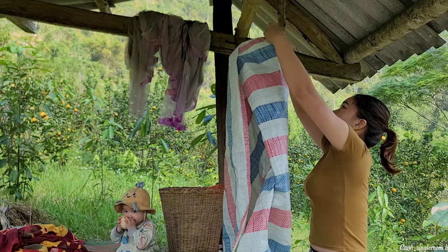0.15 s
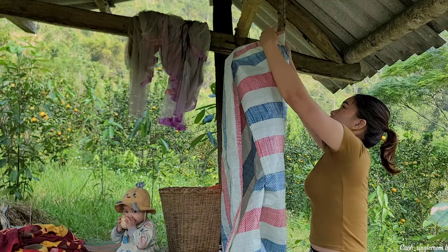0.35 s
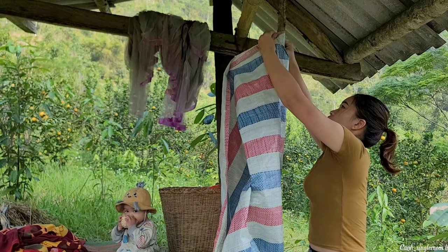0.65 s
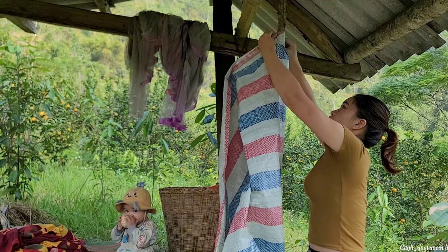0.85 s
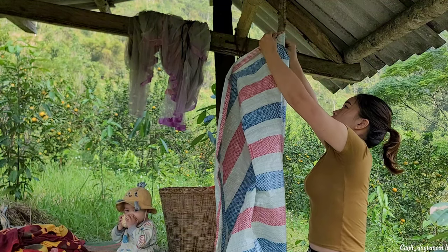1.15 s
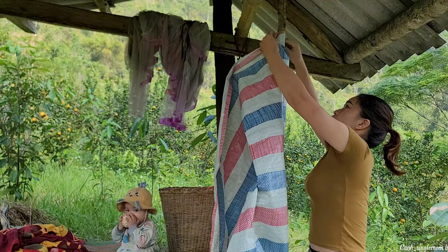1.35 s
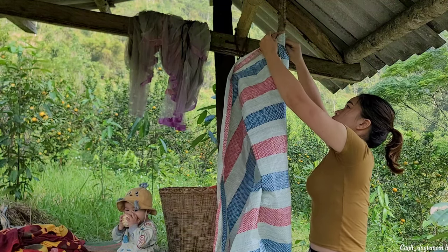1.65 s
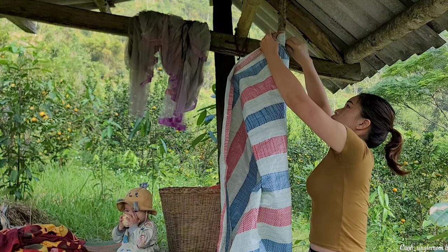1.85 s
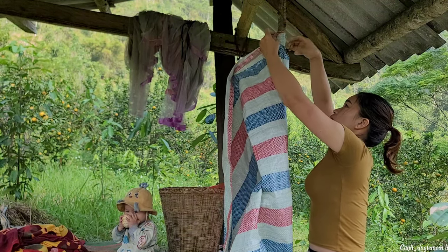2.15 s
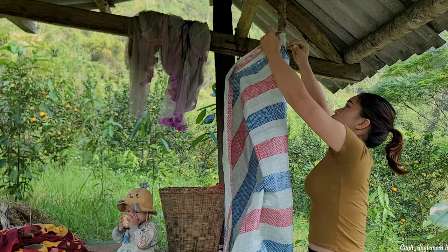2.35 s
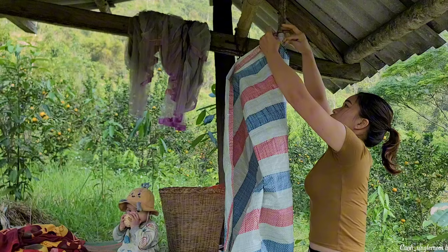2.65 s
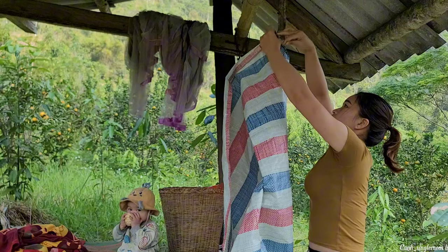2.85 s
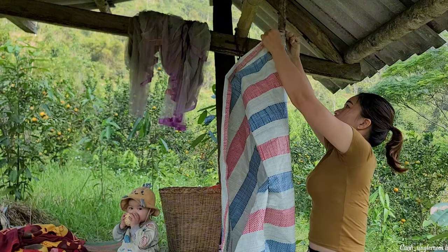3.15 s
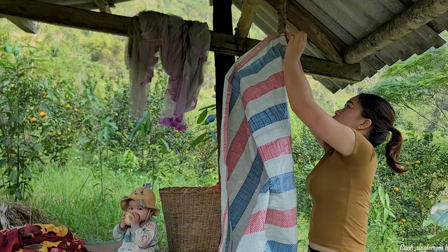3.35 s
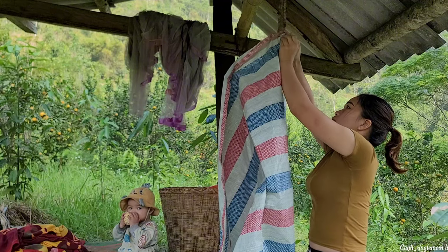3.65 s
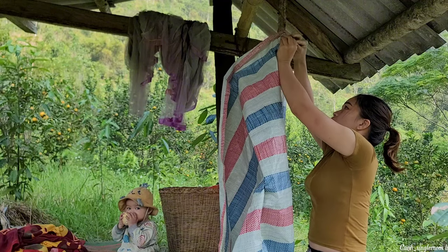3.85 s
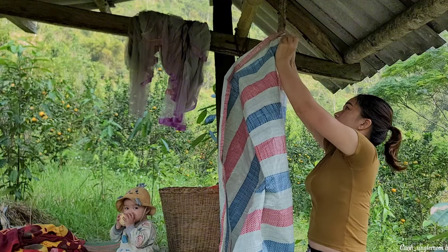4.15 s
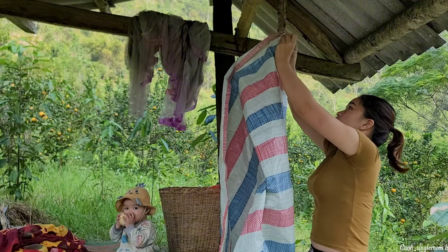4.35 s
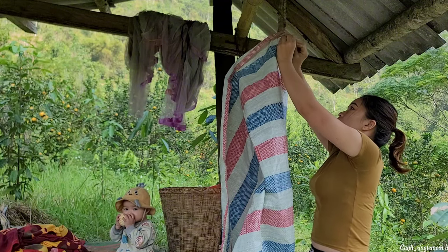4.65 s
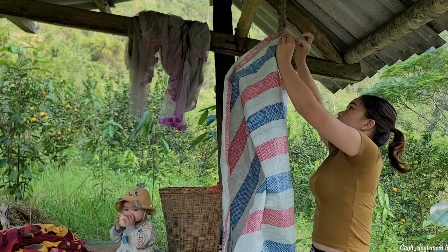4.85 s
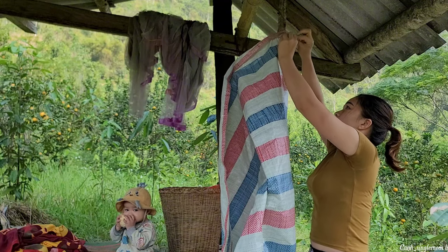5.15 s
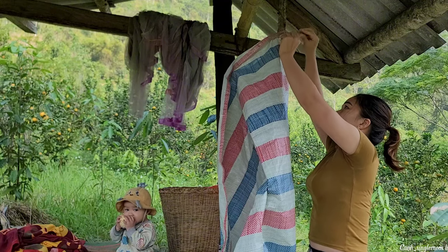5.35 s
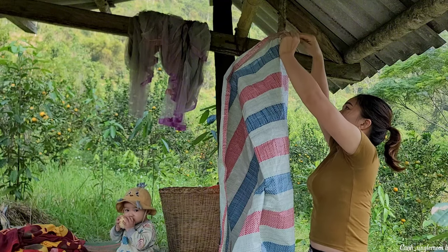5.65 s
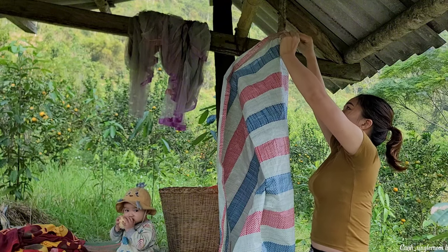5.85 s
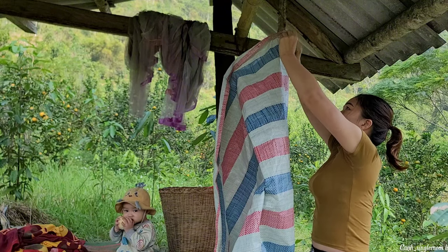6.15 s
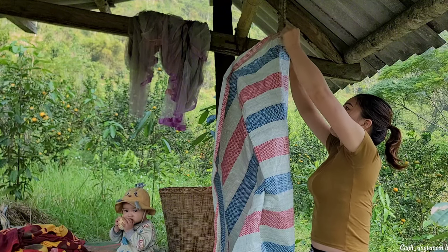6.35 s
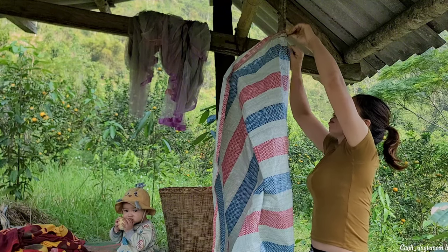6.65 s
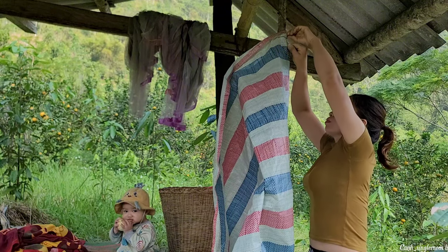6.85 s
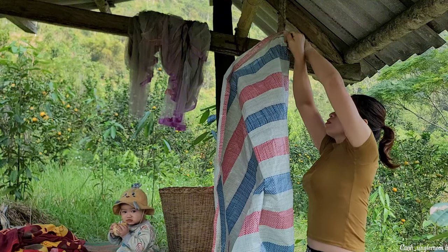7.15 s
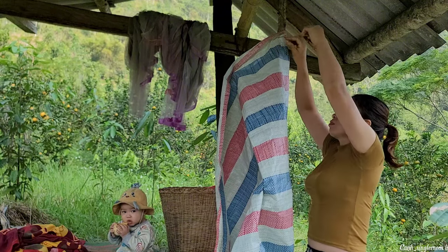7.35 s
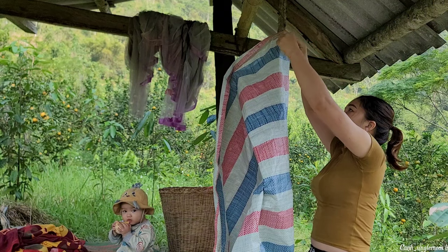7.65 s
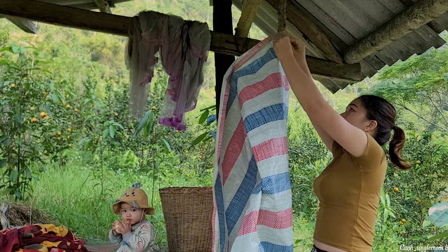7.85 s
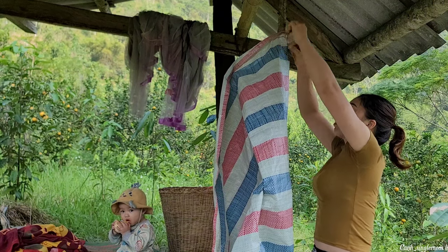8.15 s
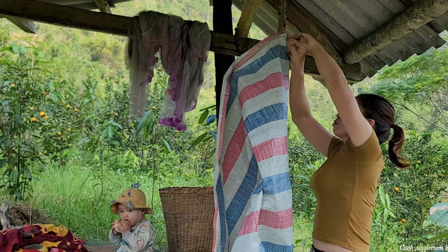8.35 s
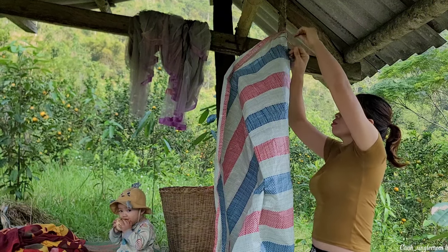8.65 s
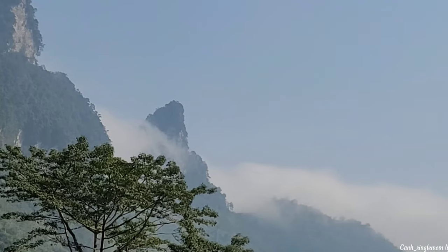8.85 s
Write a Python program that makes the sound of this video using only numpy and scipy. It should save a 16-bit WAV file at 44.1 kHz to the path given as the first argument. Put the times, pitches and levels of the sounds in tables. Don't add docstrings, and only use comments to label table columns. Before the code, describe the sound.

Close by, a woven plastic tarpaulin crackles, slides and snaps as hands tie it beneath a tin-roofed shelter. The busiest, sharpest rustling comes in the first second, then sparse tugs and dull pops. Insects hiss steadily, small birds whistle falling notes, a distant motor whines briefly, and three far wooden knocks echo. Soft low wind bumps touch the stereo microphone; at the very end the sound cuts to a windier hillside.

```python
import sys
import numpy as np
from scipy import signal
from scipy.io import wavfile
from scipy.ndimage import uniform_filter1d

SR = 44100
rng = np.random.default_rng(int(sys.argv[2]) if len(sys.argv) > 2 else 0)


def put_to_file(sound):
    columns = np.atleast_2d(sound).T
    safe = np.clip(columns, -1, 1)
    whole_steps = np.round(safe * 32767)
    wavfile.write(sys.argv[1], SR, whole_steps.astype(np.int16))


def linear_from_db(decibels):
    return 10 ** (np.asarray(decibels, float) / 20)


N = 396459
GAP_S = 8.737
# (time [s], level [dB], left minus right [dB], length [s])
BUFFETS = [(.02, -49, -16, 0.058), (0.501, -42, 11.5, 0.026), (0.768, -44.5, -4.5, 0.094),
           (0.882, -41, -10, 0.069), (1.016, -50, 31, 0.042), (1.109, -41, -7.5, 0.078),
           (2.147, -47, -1, 0.054), (3.141, -41.5, -6, 0.028), (3.384, -43, 3, 0.038),
           (3.527, -43.5, -5, 0.092), (3.689, -45, -10, 0.039), (3.802, -47.5, -8.5, 0.12),
           (4.03, -57, -4, 0.08), (4.629, -48.5, -2, 0.039), (6.675, -47.5, -4, 0.13),
           (7.23, -51.5, -10, 0.084), (7.72, -48, 1.5, 0.057), (8.274, -48.5, -3, 0.044),
           (8.504, -43.5, -8.5, 0.03), (8.803, -35.5, 12, 0.097), (8.87, -36, 17, 0.089)]


def evened(x):
    return x / np.sqrt(np.mean(x ** 2) + 1e-20)


def read(points, hz):
    f, value = np.transpose(points)
    return np.interp(np.log(hz + 1), np.log(f + 1), value)


def along(rows, t):
    s, *columns = np.transpose(rows)
    return [np.interp(t, s, c) for c in columns]


def add(mix, s, sound):
    part = mix[round(s * SR):][:len(sound)]
    part += sound[:len(part)]


def shelter_db(hz):
    # (frequency [Hz], width [Hz], gain [dB])
    modes = [(219, 15, 13), (352.7, 27.6, 9), (584, 19, 7), (711, 61, 8.5), (1012, 59, 8.5),
             (1100, 45, 5.5), (1438, 20, 8.5)]
    return sum(db / (1 + (2 * (hz - f) / width) ** 2) for f, width, db in modes)


def coloured(x, points, ringing=0):
    hz = abs(np.fft.fftfreq(4096, 1 / SR))
    log = np.log(linear_from_db(read(points, hz) + ringing * shelter_db(hz)))
    taps = np.fft.ifft(np.exp(log - 1j * signal.hilbert(log).imag)).real[:2048]
    taps = taps[None] / np.linalg.norm(taps)
    return signal.oaconvolve(x, taps, axes=-1)[:, :x.shape[1]]


def echoes(t60, gap):
    t = np.arange(int(SR * min(t60, 1))) / SR
    signs = rng.choice([-1., 1.], (2, SR))[:, :len(t)]
    arrives = rng.random((2, SR))[:, :len(t)] < .06
    taps = signs * arrives * linear_from_db(-60 * t / t60) * (t > gap)
    return taps / np.linalg.norm(taps, axis=1)[:, None]


def heard(x, lag, pan_db, wet_db, t60):
    direct = np.array([np.roll(x, lag) * linear_from_db(pan_db / 2), x * linear_from_db(-pan_db / 2)])
    reflected = signal.oaconvolve(x[None], echoes(t60, 0.0013), axes=1)[:, :N]
    return direct + linear_from_db(wet_db) * reflected


def tones(hz, db, partials, wobble, flutter_db=0):
    shake, flutter = evened(uniform_filter1d(rng.standard_normal((2, SR * 2)), 150))[:, :len(hz)]
    turn = 2 * np.pi * np.cumsum(hz * (1 + wobble * shake)) / SR
    stack = sum(linear_from_db(part_db) * np.sin(k * turn) for k, part_db in partials)
    return np.sqrt(2) * linear_from_db(db + flutter_db * flutter) * stack * signal.windows.tukey(len(hz), .07)


def air():
    # (frequency [Hz], coherence [0 to 1])
    likeness = [(100, 0.7), (400, 0.64), (1500, 0.55), (4000, 0.18), (12000, 0.66)]
    # (frequency [Hz], density [dB per Hz])
    valley = [(150, -9), (215, -19), (260, -9.5), (350, -3.5), (440, -3), (700, -8), (900, -11.5),
              (1600, -13.5), (2600, -12), (3500, -21), (7500, -34), (10000, -32), (13300, -22.5),
              (14500, -16.5)]
    # (frequency [Hz], density [dB per Hz])
    hillside = [(150, -6), (310, 9.5), (400, -7), (650, 1.5), (1000, -1), (1180, 4.5), (1600, -6),
                (3500, -14.5), (4700, -0.5), (7500, -27), (11000, -28), (14500, -12)]
    # (frequency [Hz], density [dB per Hz])
    chorus = [(3700, -17.5), (4300, -5), (4700, -3.5), (5300, -8), (5800, -10.5), (6800, -10), (7500, -26)]
    # (time [s], level [dB])
    chirps = [(.69, -5), (1.3, -2), (2.78, -4), (3.6, -4), (4.6, -4), (5.4, -5), (6.569, -3.5), (7.4, -5),
              (8.5, 2)]
    air_db, hill_db = -58.5, 2
    frames, hz = N // 512 + 5, np.fft.rfftfreq(2048, 1 / SR)
    t = np.arange(frames) * 512 / SR
    a, b, c, d, patches = rng.standard_normal((frames, 1025, 5)).T
    patches = evened(uniform_filter1d(uniform_filter1d(patches, 24, 0), 9, 1))
    same = np.clip(read(likeness, hz), 0, 1)[:, None]
    right = a + 1j * b
    late = np.exp(-2j * np.pi * hz * 20 * np.clip(hz / 600, 0, 1) / SR)[:, None]
    z = np.array([same * late * right + np.sqrt(1 - same ** 2) * (c + 1j * d), right])
    under_roof_db = (read(valley, hz) + shelter_db(hz))[:, None]
    murmur_db = np.where(t < GAP_S, under_roof_db, read(hillside, hz)[:, None] + hill_db)
    swells = sum(linear_from_db(db) * np.exp(-((t - s) / 0.084) ** 2) for s, db in chirps)
    hz = hz[:, None]
    chirr = linear_from_db(8.0) * swells * np.exp(-((hz - 5080) / 150) ** 2)
    size = np.sqrt(linear_from_db(murmur_db) ** 2 + linear_from_db(read(chorus, hz)) ** 2 + chirr ** 2)
    side = linear_from_db(1.8 * np.clip(1.5 - hz / 8000, 0, 1) * [[[-1]], [[1]]])
    z *= size * linear_from_db(2.0 * patches) * (hz > 120) * side
    return linear_from_db(air_db) * evened(signal.istft(z, nperseg=2048, noverlap=1536)[1][:, :N])


def machine():
    # (harmonic number [1], level [dB])
    harmonics = [(7, -11.5), (8, -12.5), (10, -13), (11, -28), (12, -4.5), (13, -12)]
    # (start [s], length [s], held shaft rate [Hz], level at start [dB], level held [dB])
    runs = [
        (1.751, 0.67, 217.8, -88, -67.5),
        (5.537, 0.83, 216.4, -103, -75),
        (7.716, 0.79, 220.8, -64, -63),
    ]
    run_up_hz, run_up_s = 6.15, 0.0504
    settle_s, leave_s, leave_db = 0.11, 0.069, -12
    out = np.zeros(N)
    for s, length, hz, start_db, held_db in runs:
        t = np.arange(0, length, 1 / SR)
        turns_s = [0, settle_s, length - leave_s, length]
        db = np.interp(t, turns_s, [start_db, held_db, held_db, held_db + leave_db])
        shaft_hz = hz - run_up_hz * np.exp(-t / run_up_s)
        add(out, s, tones(shaft_hz, db, harmonics, wobble=0.00046, flutter_db=1.0))
    return heard(out, -20, pan_db=6.0, wet_db=-29, t60=0.33)


def whistle(note, wobble, flutter_db):
    direct_db = -0.5
    start_s = note[0][0]
    hz, db = along(note, np.arange(start_s, note[-1][0], 1 / SR))
    attack_hz = 220 * np.exp(-np.arange(len(hz)) / (.004 * SR))
    hz = uniform_filter1d(hz, 200, mode="nearest") + attack_hz
    return start_s, tones(hz, db + direct_db, [(1, 0)], wobble, flutter_db)


def warble(length, first_hz, last_hz, db):
    arch_hz, arch_s, edges_db = 440, .007, -12
    quaver_hz, quaver_per_s = 80, 21
    t = np.arange(0, length, 1 / SR)
    arch = 1 - np.exp(-np.minimum(t, length - t) / arch_s)
    quaver = quaver_hz * np.cos(2 * np.pi * quaver_per_s * (t - length / 2))
    hz = first_hz + (last_hz - first_hz) * t / length + arch_hz * arch - quaver
    return tones(hz, db + edges_db * (1 - arch), [(0.98, 0)], wobble=0.0028)


def birds():
    # (time [s], pitch [Hz], level [dB])
    whistles = [
        [(0.862, 3210, -60), (0.876, 3220, -55), (0.884, 2949, -52), (0.914, 2870, -53.5), (0.93, 2655, -47),
         (0.95, 2660, -60)],
        [(1.08, 2600, -63), (1.092, 2640, -57), (1.1, 2730, -57), (1.113, 2720, -50)],
        [(1.195, 3341, -60), (1.235, 2850, -48), (1.255, 2923, -56), (1.263, 2720, -47), (1.277, 2704, -43),
         (1.285, 2700, -68)],
        [(1.452, 3260, -56), (1.466, 2974, -46), (1.476, 2625, -49), (1.488, 2620, -43.5), (1.504, 2640, -51),
         (1.51, 2586, -44)],
        [(1.588, 3280, -38), (1.594, 3250, -53), (1.628, 2660, -41.5), (1.638, 2690, -47.5), (1.65, 2710, -44),
         (1.67, 2606, -49.5), (1.688, 2480, -58)],
        [(2.938, 3270, -61), (2.952, 2930, -48.5), (2.966, 2665, -46), (2.984, 2513, -54), (2.994, 2580, -55),
         (3.002, 2530, -52)],
        [(3.085, 2971, -55), (3.093, 3126, -56), (3.129, 2640, -43.5), (3.153, 2690, -49), (3.169, 2540, -52),
         (3.21, 2540, -70)],
        [(7.453, 3256, -60), (7.469, 3153, -51), (7.487, 2720, -49), (7.503, 2490, -63), (7.517, 2469, -55),
         (7.535, 2466, -71)],
        [(7.607, 2954, -60), (7.615, 3030, -51.5), (7.639, 2810, -53), (7.647, 2842, -66), (7.655, 2520, -56),
         (7.665, 2539, -64)],
        [(7.667, 2680, -60), (7.689, 2460, -53.5), (7.701, 2470, -51), (7.71, 2581, -68)],
    ]
    # (time [s], pitch [Hz], level [dB])
    blurred = [(1.058, 2900, -66), (1.07, 3260, -56), (1.085, 2800, -59)]
    # (time [s], pitch [Hz], level [dB])
    taut_corner = [(8.685, 1050, -66), (8.7, 1060, -62), (8.737, 1050, -54)]
    # (time [s], pitch [Hz], level [dB])
    riser = [(7.53, 1850, -66), (7.56, 2100, -60), (7.59, 2320, -65), (7.62, 2480, -65), (7.67, 2440, -63)]
    # (start [s], length [s], first pitch [Hz], last pitch [Hz], level [dB])
    warbles = [
        (6.299, 0.019, 3110, 3150, -52),
        (6.362, 0.012, 3820, 3150, -48.5),
        (6.387, 0.078, 2980, 2790, -47.5),
        (6.49, 0.031, 2600, 2310, -44),
        (6.53, 0.018, 2150, 2350, -60),
        (6.541, 0.011, 2970, 3220, -38.5),
    ]
    far, near = np.zeros((2, N))
    for note in whistles:
        add(far, *whistle(note, .017, 2.5))
    add(far, *whistle(blurred, .06, 3))
    add(near, *whistle(taut_corner, .004, 1))
    add(far, *whistle(riser, .012, 3))
    for s, *note in warbles:
        add(near, s, warble(*note))
    slope = signal.oaconvolve((far + .5 * near)[None], echoes(0.5, 0.075), axes=1)[:, :N]
    far = heard(far, 14, pan_db=-4.5, wet_db=-2.5, t60=.085)
    near = heard(near, 25, pan_db=-4.5, wet_db=-5.0, t60=0.11)
    return far + near + linear_from_db(-8.5) * slope


def gusts(t):
    # (time [s], level [dB])
    breeze = [(0, -46), (.6, -56), (1.1, -47), (1.3, -52), (2.9, -55), (3.6, -53.5), (4.3, -51.5),
              (5.4, -56), (6.5, -54.5), (7.1, -57.5), (7.3, -58), (8.73, -56.5), (8.762, -39), (8.99, -40)]
    power, lean = linear_from_db(along(breeze, t)[0]) ** 2, np.zeros(N)
    for s, db, pan_db, length in BUFFETS:
        bell = linear_from_db(db - 3.0) ** 2 * signal.windows.hann(round(2 * length * SR))
        add(power, max(s - length, 0), bell)
        add(lean, max(s - length, 0), pan_db * bell)
    return 10 * np.log10(power), lean / power


def thumps():
    thump_hz, thump_db = 64.3, -2.5
    out = np.zeros((2, N))
    for (s, db, pan_db, length), (tune, turn) in zip(BUFFETS, rng.random((len(BUFFETS), 2))):
        t = np.arange(-length, length, 1 / SR)
        cycles = np.cos(2 * np.pi * (thump_hz * (0.474 + 1.0 * tune) * t + turn))
        push = cycles * signal.windows.hann(len(t)) ** 2
        for port, side in zip(out, (.5, -.5)):
            add(port, max(s - length, 0), linear_from_db(db + thump_db + side * pan_db) * push)
    return out


def wind():
    # (frequency [Hz], density [dB per Hz])
    turbulence = [(15, -41), (30, -11.5), (45, 0.5), (70, -2.5), (100, 1.5), (130, -4.5), (160, -11.5),
                  (215, -18.5), (260, -28), (400, -75)]
    level_db, pan_db = gusts(np.arange(N) / SR)
    noise = coloured(rng.standard_normal((3, N)), turbulence)
    lumps = linear_from_db(2.87 * evened(uniform_filter1d(rng.standard_normal((3, N)), 1500)))
    left, right, shared = evened(noise * lumps)
    own = np.clip(0.17 + 0.087 * abs(pan_db), 0, .95)
    both = np.sqrt(1 - own ** 2) * shared + own * np.array([left, right])
    return linear_from_db(level_db) * both * linear_from_db([pan_db / 2, -pan_db / 2]) + thumps()


def moan():
    # (start [s], length [s], first pitch [Hz], last pitch [Hz], level [dB])
    low_note = (8.761, .075, 345, 300, -50)
    s, length, *ends, db = low_note
    out = np.zeros(N)
    share = np.linspace(0, 1, round(length * SR))
    hz = np.interp(share, [0, 1], ends)
    add(out, s, tones(hz, db - 10 * share ** 2, [(1, 0), (2, -7)], wobble=.02, flutter_db=1))
    return np.array([out, out])


def blows():
    # (time [s], peak [dB], tail t60 [s], rise [s])
    strokes = [
        (0.741, -33.5, 0.79, 0.002),
        (4.304, -29.5, 0.69, 0.003),
        (7.163, -28.5, 0.64, 0.0052),
    ]
    # (frequency [Hz], density [dB per Hz])
    wood = [(150, -50), (250, -12.5), (495, -9.5), (561, -3), (654, -7), (721, -3), (1050, -4),
            (1160, -3.5), (2000, -14), (3740, -19), (7000, -33.5), (9100, -49), (15400, -120)]
    # (frequency [Hz], density [dB per Hz])
    front_a = [(240, -14), (400, 3), (590, -10), (903, 5), (1670, -14), (2170, -1), (4790, -9), (8000, -31),
               (10400, -62), (17600, -120)]
    # (frequency [Hz], density [dB per Hz])
    front_b = [(180, -41), (300, -11), (542, 4.5), (760, 9), (1020, -7), (1840, -2), (3710, -11),
               (5300, -40), (8000, -46), (10400, -68), (17600, -120)]
    # (frequency [Hz], density [dB per Hz])
    front_c = [(180, -46), (300, -17), (557, 0), (1190, 3), (1500, -7), (2000, -10), (2200, -22),
               (2740, 3.5), (8000, -40), (10400, -63), (17600, -120)]
    out, t = np.zeros((2, N)), np.arange(SR) / SR
    sprays = rng.standard_normal((len(strokes), 3, SR))
    for (s, db, t60, rise), colour, spray in zip(strokes, (front_a, front_b, front_c), sprays):
        spray = spray * linear_from_db(3 * np.tanh(evened(uniform_filter1d(spray[2, ::-1], 200))))
        shared = np.array([np.roll(spray[2], 20), spray[2] * linear_from_db(4.5)])
        spray = 0.5 * shared + 0.4 * spray[:2]
        spray = spray * linear_from_db(db - 2.5) * np.clip(t / (2 * rise), 0, 1) ** 2
        front = coloured(spray * (linear_from_db(-3 - 60 * t / 0.07) + linear_from_db(-4 - 60 * t / .17)), colour)
        sound = front + coloured(spray * linear_from_db(-6.5 - 60 * t / t60), wood)
        for port in range(2):
            add(out[port], s - .002, sound[port])
    return out


def tugs(t):
    # (time [s], effort [dB])
    sway = [(0, -63.5), (.6, -64), (1.0, -65), (1.4, -63.5), (2.1, -67), (2.6, -70.5), (2.85, -72.5),
            (3.1, -59), (3.4, -69.5), (3.7, -67.5), (4.6, -64.5), (5.2, -66.5), (5.6, -84), (6.2, -68),
            (6.9, -65.5), (7.5, -74), (8.2, -69.5), (8.7, -60.5)]
    # (start [s], length [s], folds flapping [dB], weave scraping [dB])
    pulls = [(0.053, 0.079, -59, -63.5), (0.2, 0.3, -76, -69), (0.276, 0.087, -49, -56),
             (0.409, 0.041, -49, -70), (0.444, 0.026, -51, -62), (0.495, 0.016, -63, -73),
             (0.538, 0.055, -54.5, -61.5), (0.581, 0.045, -50.5, -72), (.665, 0.093, -55.5, -87),
             (0.827, 0.077, -48, -65), (1.119, 0.047, -64, -43.5), (1.15, 0.098, -52.5, -58),
             (1.531, 0.12, -60.5, -48), (2.09, 0.14, -62.5, -76.5), (2.443, 0.12, -62.5, -74),
             (2.504, 0.065, -59, -68), (2.547, 0.14, -64, -73.5), (2.669, 0.084, -57, -75),
             (3, 0.072, -56.5, -66.5), (3.204, 0.11, -55, -66.5), (3.458, 0.065, -55.5, -73),
             (3.51, 0.054, -56, -71), (3.562, 0.059, -66, -71), (3.805, 0.041, -55, -70),
             (3.845, 0.066, -57.5, -69), (3.962, 0.044, -60, -64), (3.989, 0.041, -46, -62),
             (4.104, 0.15, -60, -69.5), (4.661, 0.041, -55.5, -72), (4.948, 0.13, -59.5, -88),
             (6.417, 0.053, -65, -69), (6.472, 0.1, -65, -67), (6.657, 0.052, -56.5, -71),
             (7.022, 0.026, -59.5, -57), (7.263, 0.12, -59, -68), (7.335, 0.036, -57, -63),
             (7.693, 0.16, -60.5, -75), (8.342, 0.015, -60, -67), (8.384, 0.25, -64, -73),
             (8.462, 0.016, -49, -61), (8.532, 0.061, -53.5, -65), (8.584, 0.066, -49.5, -67.5),
             (8.631, 0.077, -48.5, -76)]
    stir_db, stir_s = 2.0, .025
    weave_offset_db, weave_slope = -15.5, 2.18
    rise_share, sharpness = 0.39, 0.88
    width = round(stir_s * SR)
    stirs = evened(uniform_filter1d(uniform_filter1d(rng.standard_normal(N), width), width))
    sway_db = along(sway, t)[0] + stir_db * stirs
    mean_db = sway_db.mean()
    weave_db = mean_db + weave_slope * (sway_db - mean_db) + weave_offset_db
    power = linear_from_db([sway_db, weave_db]) ** 2
    bend = np.log(.5) / np.log(rise_share)
    for s, length, folds_db, weave_db in pulls:
        arch = np.sin(np.pi * np.linspace(0, 1, round(length * 1.04 * SR)) ** bend) ** 2
        for layer, db in zip(power, (folds_db, weave_db)):
            add(layer, s - 0.06 * length, linear_from_db(db) ** 2 * arch ** sharpness)
    return 10 * np.log10(power)


def crackle(per_s, spread_db, clump_db, smooth):
    size = linear_from_db(spread_db * np.minimum(rng.exponential(1, N), 5)) * (rng.random(N) < per_s / SR)
    clumps = linear_from_db(clump_db * evened(uniform_filter1d(rng.standard_normal(N), 500)))
    buckles = evened(size * rng.choice([-1, 1], N))
    own, hush = smooth * rng.standard_normal((2, N))
    both = np.array([np.roll(buckles + 0.16 * hush, 4) + 1.63 * own, buckles + hush])
    return evened(both * clumps)


def sheet():
    # (frequency [Hz], density [dB per Hz])
    fold_colour = [(180, -20.5), (330, 4), (600, -2), (1000, 1), (1500, 4.5), (2300, 1.5), (3500, -27),
                   (6000, -47)]
    # (frequency [Hz], density [dB per Hz])
    weave_colour = [(4000, -48), (6000, -16), (7800, 11.5), (9000, 9.5), (9900, -7), (11500, 5), (14000, 2),
                    (16000, -27)]
    # (frequency [Hz], density [dB per Hz])
    creases = [(1200, -21.0), (2200, -4.5), (3500, 0.5), (5500, -3.5), (7000, -5.0), (9000, -18.0)]
    folds_db, weave_db = tugs(np.arange(N) / SR)
    crease_db = 0.47 * folds_db + 0.52 * weave_db + 9.5
    folds = linear_from_db(folds_db) * crackle(700, spread_db=2.5, clump_db=2.5, smooth=.7)
    folds = coloured(folds, fold_colour, ringing=1.0)
    crease = coloured(linear_from_db(crease_db) * crackle(1500, spread_db=3.5, clump_db=2.5, smooth=.7), creases)
    weave = coloured(linear_from_db(weave_db) * crackle(3000, spread_db=3.5, clump_db=3.0, smooth=1.3), weave_colour)
    both = (folds + crease) * linear_from_db([[-1.4], [1.4]]) + weave * linear_from_db([[-.6], [.6]])
    return both * (np.arange(N) < GAP_S * SR)


def ticks():
    # (time [s], peak [dB], centre [Hz])
    dry_ticks = [(0.3066, -19, 5500), (0.4187, -42, 4300), (0.446, -39, 3000), (.2688, -44, 3700),
                 (0.2855, -14, 3500), (.3077, -17, 3000), (0.312, -25, 1500), (2.2114, -39, 2620),
                 (4.94, -41, 3680), (6.9866, -46, 5200), (8.4637, -45, 5100), (8.5804, -40, 2000),
                 (8.536, -44, 1500), (0.411, -34, 2430), (0.417, -25.5, 2500), (0.42, -43, 4200),
                 (0.447, -33, 1000), (0.54, -32.5, 2430), (0.608, -42, 1350), (0.836, -40, 1440),
                 (1.1165, -26, 4500), (2.524, -47, 2290), (2.577, -40, 3680), (2.614, -50, 6000),
                 (2.668, -45, 3340), (2.707, -41, 1100), (2.876, -40, 4570), (3.013, -47, 2630),
                 (3.042, -39, 1850), (3.958, -45, 2050), (3.977, -36, 2050), (3.993, -44, 1700),
                 (3.998, -29.5, 1300), (4.006, -30.5, 1120), (4.125, -36.5, 1430), (4.154, -49, 1120),
                 (4.184, -46, 2040), (7.029, -52, 1540), (7.34, -50, 1480), (7.574, -41, 2280),
                 (8.139, -40, 4120), (8.224, -39, 2630), (8.35, -45, 4670), (8.603, -35, 972)]
    spray_share, t60, wide = .16, .03, 2.5
    out, t = np.zeros((2, N)), np.arange(2000) / SR
    for (s, db, hz), spray in zip(dry_ticks, rng.standard_normal((len(dry_ticks), 2, len(t)))):
        band = signal.butter(1, [hz / wide, min(hz * wide, 15000)], "band", fs=SR, output="sos")
        click = signal.sosfilt(band, (t < .2 / hz) + spray_share * linear_from_db(-60 * t / t60) * spray)
        click = linear_from_db(db) * click / abs(click).max()
        add(out[0], s + .001 + 4 / SR, linear_from_db(-1) * click[0])
        add(out[1], s + .001, linear_from_db(1) * click[1])
    return out


def snaps():
    # (time [s], peak [dB], ring [Hz], treble [dB])
    bright_snaps = [(0.092, -40.5, 1100, -15), (0.283, -29.5, 1100, 13), (0.304, -19, 1100, 12),
                    (0.3048, -31, 1700, 9), (0.496, -48.5, 8450, -5), (1.116, -29, 3670, -10),
                    (3.044, -47, 636, -17), (3.239, -43, 1080, -13), (3.815, -50.5, 1940, 18.5),
                    (4.94, -55, 3330, 15), (5.147, -45, 710, 0), (5.297, -45, 1470, -12),
                    (5.296, -50.5, 8400, -12), (6.089, -53, 690, 6), (7.028, -88, 1520, -14),
                    (7.341, -47.5, 1480, 9), (7.948, -36, 2150, 3), (8.139, -65, 2670, 31),
                    (8.345, -60, 3070, -2)]
    # (time [s], peak [dB], ring [Hz], t60 [s])
    dull_pops = [(0.415, -36, 2580, 0.051), (0.446, -57, 1020, 0.046), (0.835, -38, 1520, 0.17),
                 (2.313, -50.5, 1550, 0.079), (2.523, -41, 2390, 0.084), (2.669, -39.5, 3270, 0.06),
                 (2.706, -48.5, 1120, 0.089), (3.519, -42, 1990, 0.098), (3.575, -46.5, 2100, 0.23),
                 (3.959, -47, 2100, 0.19), (3.999, -40, 1180, 0.062), (4.126, -49, 1200, .1),
                 (4.57, -39.5, 1540, 0.29), (5.628, -50.5, 1720, 0.17), (6.418, -45, 1370, 0.077),
                 (6.044, -49.5, 1050, 0.096), (6.672, -40.5, 2750, 0.073), (7.489, -39, 800, 0.47),
                 (8.279, -50, 711, 0.42), (8.349, -47, 3420, 0.09), (8.463, -53, 2260, .049),
                 (8.536, -44, 1470, 0.14), (8.581, -57, 1460, .24)]
    snap_t60, pop_treble_db = 0.1, -75
    faint_db, faint_narrow = -41, .45
    out, t = np.zeros((2, N)), np.arange(9000) / SR
    tick = np.sin(2 * np.pi * t / 0.00028) * np.exp(-t / 0.000056)
    bright = signal.butter(1, [1500, 11000], "band", fs=SR, output="sos")
    rows = [row + (snap_t60,) for row in bright_snaps]
    rows += [(s, db, hz, pop_treble_db, t60) for s, db, hz, t60 in dull_pops]
    for (s, db, hz, treble_db, t60), spray in zip(rows, rng.standard_normal((len(rows), 3, len(t)))):
        tail = linear_from_db(-60 * t / np.clip(t60, .01, .4)) * np.clip(t / 0.00056, 0, 1)
        narrow = faint_narrow if db < faint_db else 1
        edges_hz = hz * np.array([0.74, 1.51]) ** narrow
        pocket = signal.butter(2, edges_hz, "band", fs=SR, output="sos")
        ring = signal.sosfilt(pocket, (t < .4 / hz) + 0.5 * tail * (spray[2] + 0.5 * spray[:2]))
        crack = signal.sosfilt(bright, tick + .032 * tail * spray[:2])
        sound = linear_from_db(db) * (ring / abs(ring).max() + linear_from_db(treble_db) * crack / abs(crack).max())
        add(out[0], s + 0.001227 + 4 / SR, linear_from_db(-3.0) * sound[0])
        add(out[1], s + 0.00124, linear_from_db(3.5) * sound[1])
    return out


def scene():
    return air() + machine() + birds() + wind() + moan() + blows() + sheet() + ticks() + snaps()


def top_cut(x):
    return signal.sosfilt(signal.butter(12, 15840, fs=SR, output="sos"), x)


def record(dry):
    fade_s, back_s, edge_hz = 8.705, 8.7615, 15870
    t = np.arange(N) / SR
    fade = np.interp(t, [0, fade_s, GAP_S, back_s, back_s + .001, 9], [1, 1, 0, 0, 1, 1]) ** .7
    low_pass = signal.firwin(401, edge_hz, fs=SR)[None]
    limited = signal.oaconvolve(dry * fade, low_pass, "same", axes=1)
    return top_cut(limited)


dry = scene()
out = record(dry)
put_to_file(out)
```